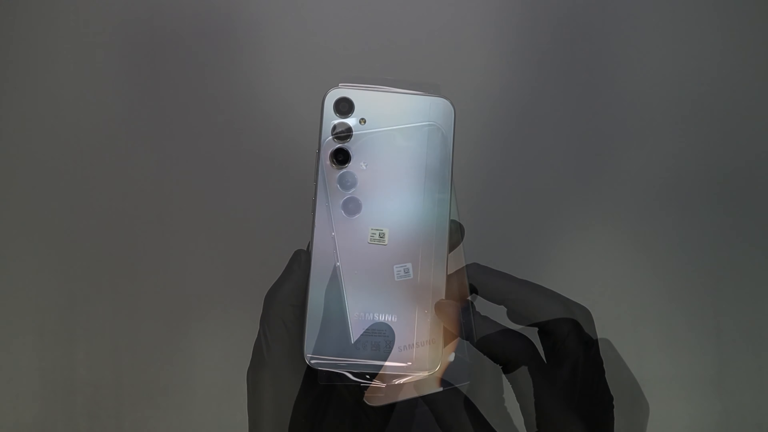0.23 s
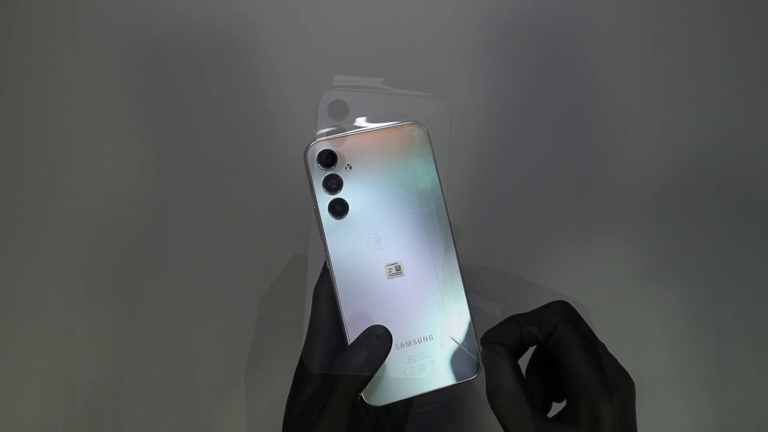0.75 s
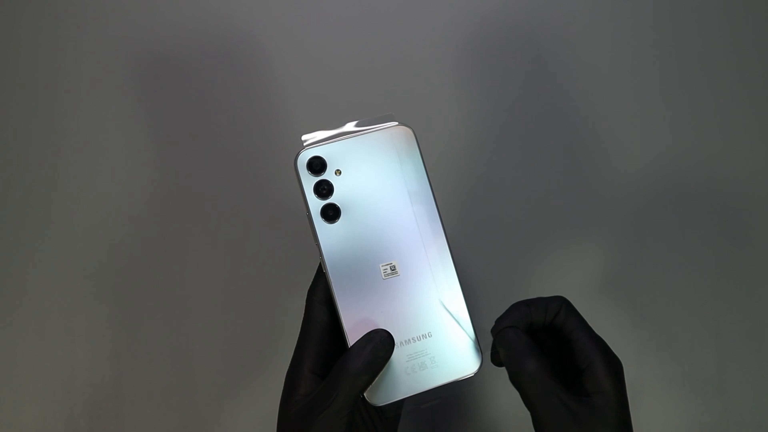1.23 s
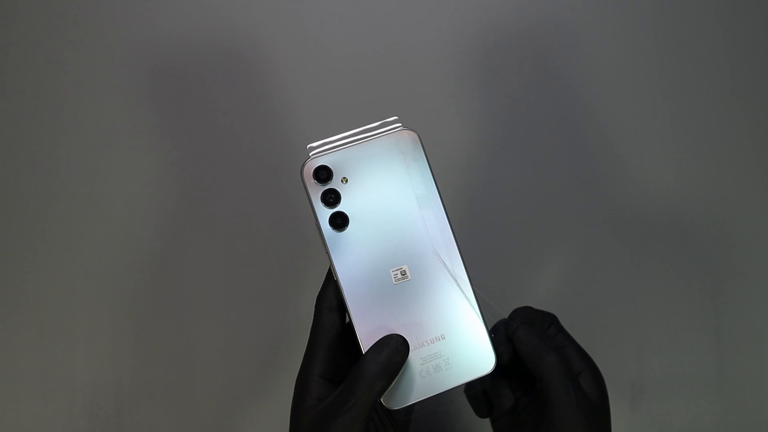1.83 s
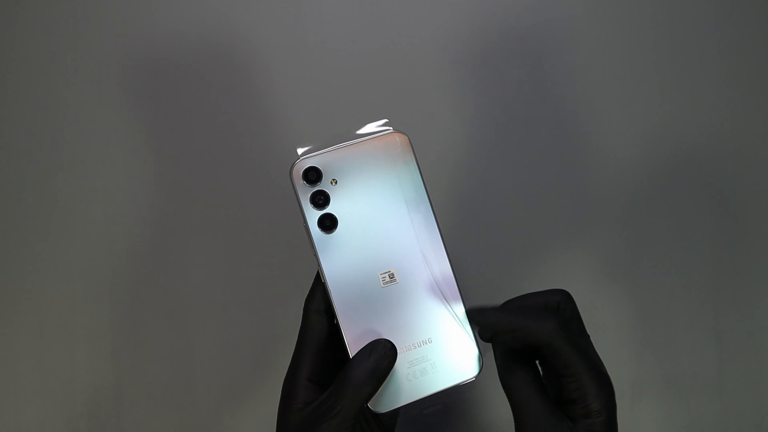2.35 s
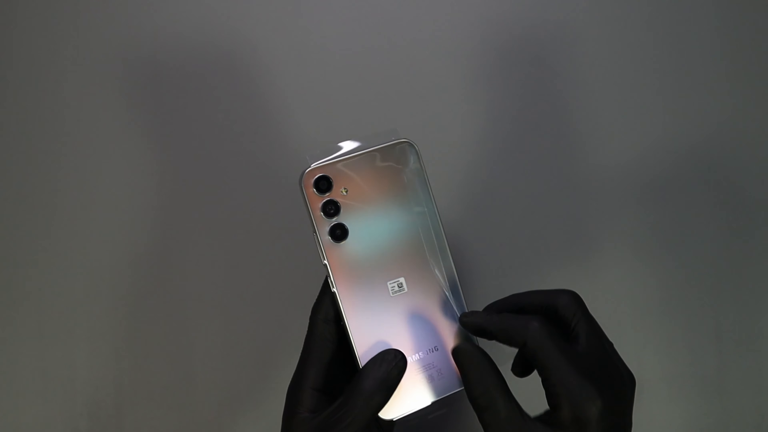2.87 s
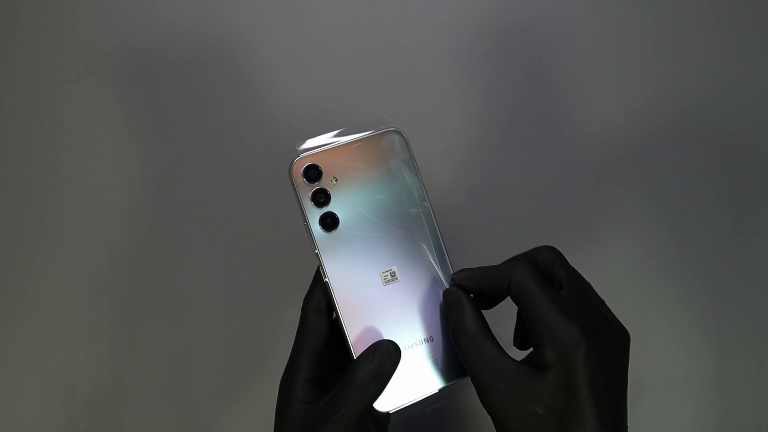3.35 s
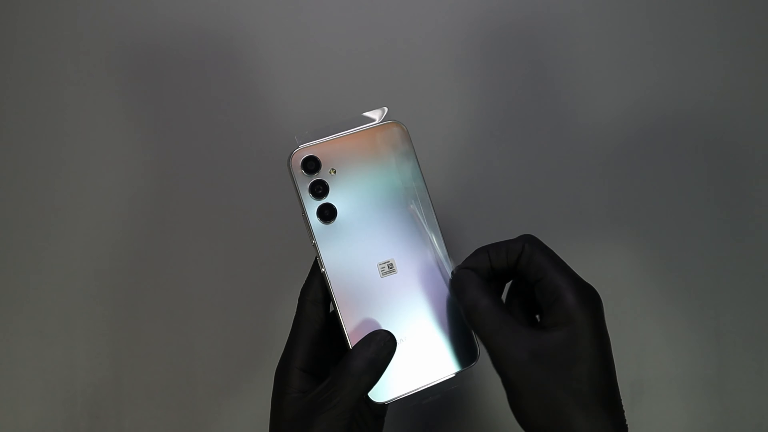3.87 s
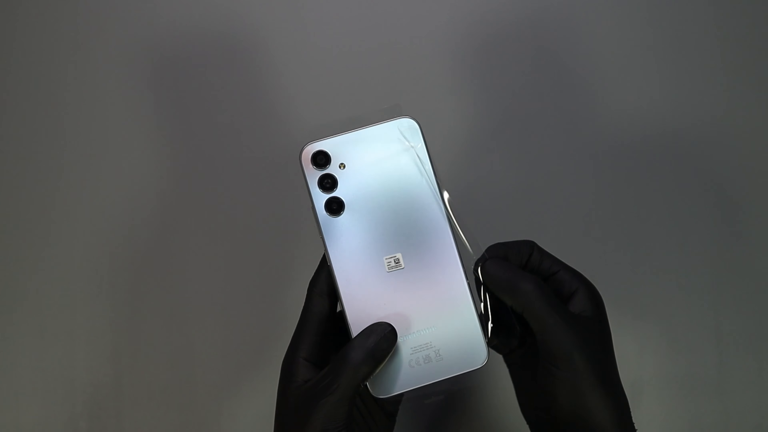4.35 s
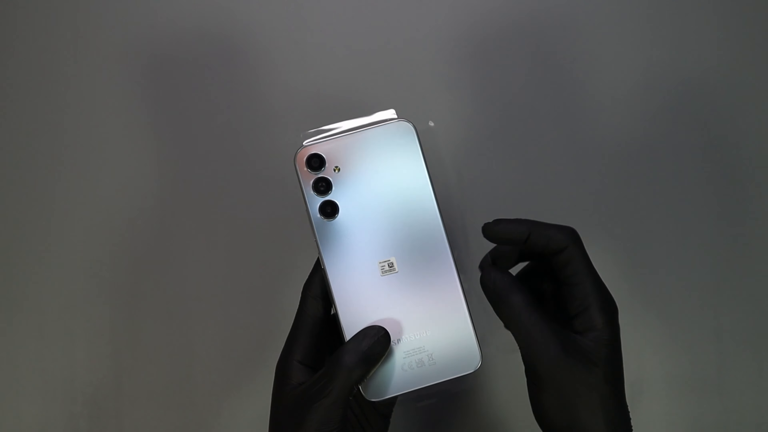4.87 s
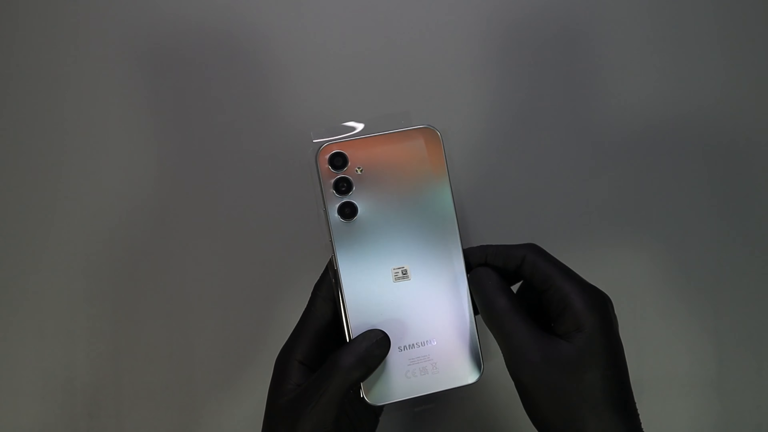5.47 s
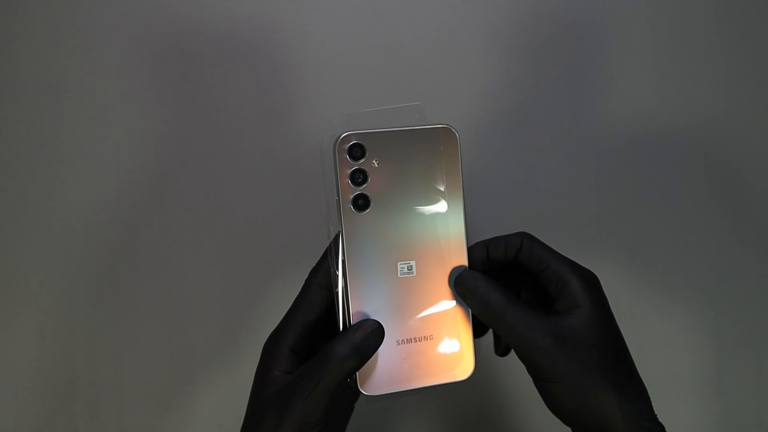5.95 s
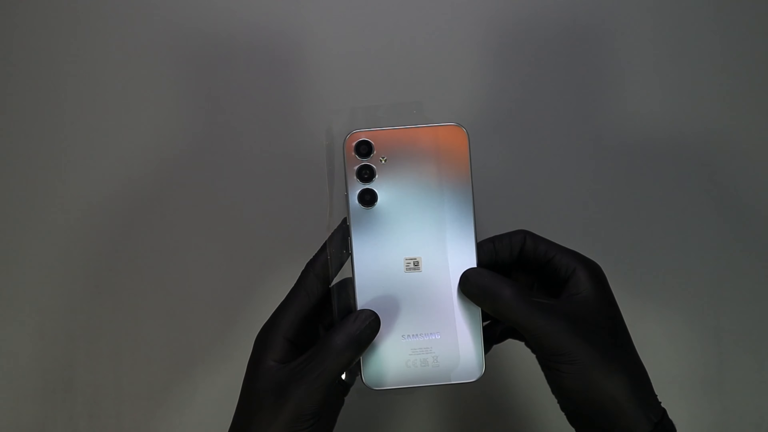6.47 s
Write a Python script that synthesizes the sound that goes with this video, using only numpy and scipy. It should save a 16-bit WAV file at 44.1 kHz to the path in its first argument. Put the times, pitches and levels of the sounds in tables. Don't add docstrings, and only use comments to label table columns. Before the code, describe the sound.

A close, detailed take in a small quiet room, with very faint ventilation rumble, low hum and hiss underneath. From 0.2 to 1.9 seconds a nail picks at thin plastic: tiny flutters, then dry bright ticks, stronger around 1.4 to 1.8, while a gloved fingertip slides with a faint airy hiss from 0.8 to 2.2. A sharp pop lands at 2.0, a duller crunch with a soft knock at 2.8, and a loud crisp pop at 3.2. A snap at 3.8 opens the steady peel; crackling hiss and hard snaps crowd 4.0 to 4.9, peaking near 4.6 with a brief hollow thud from the glass slab. Smaller clicks follow at 5.2 and 5.5, with a fluttering crinkle at 5.8. From 5.9 to the end near 6.7, muted folds crush and roll, some sliding down in pitch, amid soft rubbing and fine crackle.

```python
import sys
import numpy as np
from scipy import signal
from scipy.fft import rfft, irfft
from scipy.io import wavfile
from scipy.ndimage import uniform_filter1d

SR = 44100
rng = np.random.default_rng(int(sys.argv[2]) if len(sys.argv) > 2 else 0)


def rack_gain(trim_db):
    fader = np.asarray(trim_db, float)
    return 10 ** (fader / 20)


def dump_mix(stems):
    frames = np.atleast_2d(stems).T
    limited = np.clip(frames, -1, 1)
    pcm = np.round(limited * 32767).astype(np.int16)
    wavfile.write(sys.argv[1], SR, pcm)


N = 295911

# pitch in Hz, width in Hz, level in dB.
FILM = [(4900, 1000, -4), (5900, 3550, 1), (7500, 2200, -6)]
# pitch in Hz, width in Hz, level in dB.
EDGE = [(8400, 6900, 4.5), (12100, 3900, 2.5), (13500, 11000, -2), (15100, 2000, -8)]


def unit(x):
    return x / np.sqrt(np.mean(x ** 2))


def walk(rate):
    hold = int(SR / rate)
    levels = rng.standard_normal(N // hold + 1)
    return uniform_filter1d(np.repeat(levels, hold), hold)[:N]


def grit(size, scatter_db):
    tail = np.minimum(rng.exponential(size=size), 6.3)
    return unit(rng.standard_normal(size) * rack_gain(scatter_db * tail))


def power(hz, modes, stretch=1):
    total = 0
    for f, width, db in modes:
        off_pitch = (hz ** 2 - (f * stretch) ** 2) / (width * hz)
        total = total + rack_gain(2 * db) / (1 + off_pitch ** 2) ** 2
    return total / total.mean()


def ring(x, modes):
    hz = np.fft.rfftfreq(N, 1 / SR) + 1
    return irfft(rfft(x) * np.sqrt(power(hz, modes)), N)


def colour(points):
    hz, db = np.transpose(points)[:2]
    log_hz = np.log(np.fft.rfftfreq(N, 1 / SR) + 1)
    return irfft(rfft(rng.standard_normal(N)) * rack_gain(np.interp(log_hz, np.log(hz), db)), N)


def causal(p):
    cep = irfft(np.log(p + 1e-12) / 2)
    cep[1:len(cep) // 2] *= 2
    cep[len(cep) // 2 + 1:] = 0
    return np.exp(rfft(cep))


def slips(ms, lead):
    u = np.arange(6000) / SR / (ms / 1000)
    run = u ** 0.59 * np.exp(-u) * grit(len(u), scatter_db=3.0)
    lead = np.clip(lead, 0, 1)
    run *= np.sqrt((1 - lead) / np.sum(run ** 2))
    run[12] += np.sqrt(lead)
    return run * np.sqrt(SR * (0.00084 + ms / 1000))


def struck(rows, parts, detune, notes=()):
    size = 8192
    hz = np.fft.rfftfreq(size, 1 / SR) + 1
    out = np.zeros((3, N + size))
    stretch = 1 + detune * rng.standard_normal((len(rows), len(parts)))
    owner = [np.argmin([abs(row[0] - note[0]) for row in rows]) for note in notes]
    for k, (s, run, dbs) in enumerate(rows):
        p = sum(rack_gain(2 * db) * power(hz, modes, q) for db, modes, q in zip(dbs, parts, stretch[k]))
        for (_, f, width, db), j in zip(notes, owner):
            if j == k:
                p = p + rack_gain(2 * db) * power(hz, [(f, width, 0)])
        slip = rfft(run, size)
        lumps = uniform_filter1d(np.abs(slip) ** 2, size=40)
        even = (lumps / lumps.mean() + .1) ** -.55
        out[k % 3, int(s * SR):][:size] += irfft(slip * causal(p * even))
    return out[:, :N]


def single_rings(rows):
    out = 0
    for s, hz, width, db, ms in rows:
        hit = [(s, slips(ms, 0.16), [db])]
        out = out + struck(hit, ([(hz, width, 0)],), detune=0)[0]
    return out


def swells(gestures):
    rise_share, end_drop_db = 0.42, 11.5
    s, length, db, other_db = np.transpose(gestures)[:, :, None]
    late = np.arange(N) / SR - s
    side = length * np.where(late < 0, rise_share, 1 - rise_share)
    shape = rack_gain(-end_drop_db * np.abs(late / side) ** 1.32)
    return [np.sqrt(np.sum((rack_gain(top_db) * shape) ** 2, axis=0)) for top_db in (db, db + other_db)]


def air():
    # pitch in Hz, level in dB per Hz.
    air_curve = [(15, -43), (45, -7.5), (150, -7), (260, -13), (480, -14.5), (1200, -23.5), (3500, -26),
                 (16000, -29)]
    # pitch in Hz, width in Hz, level in dB.
    hum_bands = [(195.6, 39, -80.5), (368.3, 9.2, -81)]
    tone_hz, tone_db, air_db = 201.4, -70, -66
    skirt = sum(rack_gain(db) * ring(rng.standard_normal(N), [(hz, width, 0)]) for hz, width, db in hum_bands)
    tone = rack_gain(tone_db + 0.7 * walk(3.1)) * np.sin(2 * np.pi * tone_hz * np.arange(N) / SR)
    return rack_gain(air_db + .4 * walk(3)) * unit(colour(air_curve)) + skirt + tone


def room(x):
    # delay in ms, level in dB.
    near_echoes = [
        (1.3, -14),
        (3.4, -15.5),
        (12.3, -20.5),
        (28, -22),
    ]
    # middle of the band in Hz, time to fall by 60 dB in seconds, level in dB.
    tail_bands = [(200, 0.32, -12.5), (436.5, 0.38, -15.5), (960, 0.23, -14), (1656, 0.28, -12),
                  (3465, 0.33, -15), (6900, 0.38, -16.5), (12500, 0.31, -15.5)]
    t = np.arange(SR // 2) / SR
    tail = signal.unit_impulse(len(t))
    for ms, db in near_echoes:
        blur = rng.standard_normal(128) * np.exp(-t[:128] / .0006)
        tail[int(ms * SR / 1000):][:128] += rack_gain(db) * blur / np.sqrt(np.sum(blur ** 2))
    for hz, t60, db in tail_bands:
        band = signal.butter(2, [hz / 1.43, min(hz * 1.43, .45 * SR)], "band", fs=SR, output="sos")
        fade = (1 - np.exp(-t / 0.00085)) * rack_gain(-60 * t / t60)
        noise = signal.sosfilt(band, rng.standard_normal(len(t)))
        tail += rack_gain(db - 22.5) * noise * fade
    return signal.fftconvolve(x, tail)[:N]


def stroke():
    # time in seconds, level in dB.
    slide = [
        (0.75, -78),
        (0.886, -64.5),
        (1.044, -62.5),
        (1.436, -63),
        (1.594, -66),
        (1.774, -67),
        (2.046, -70),
        (2.2, -81),
    ]
    # pitch in Hz, width in Hz, level in dB.
    gap = [(6200, 900, -12), (7050, 1400, 0), (7900, 800, -6)]
    s, db = np.transpose(slide)
    level_db = np.interp(np.arange(N) / SR, s, db, -120, -120) - 3.5
    gain = rack_gain(level_db + 2.1 * walk(30))
    return ring(gain * grit(N, scatter_db=5.0), gap)


def rub():
    # time of most effort in seconds, length in seconds,
    # film level in dB, free edge in dB against the film.
    pulls = [(0.274, .3, -78, 3), (1.007, 0.31, -61, 0.5), (1.568, 0.64, -64.5, 12.5),
             (2.254, 0.44, -64, -9), (2.797, 0.55, -63.5, -7), (3.398, 0.37, -65, 0.5),
             (3.764, 0.15, -53, 0), (4.003, 0.54, -48.5, -3), (4.5, 0.57, -50, -5), (4.597, .1, -35, 0),
             (4.724, 0.063, -48, -20), (4.936, 0.089, -49, -26), (5.297, 0.35, -59.5, -5),
             (5.547, 0.39, -63, -6), (5.87, 0.24, -60, -4), (6.1, 0.34, -70, 3), (6.7, 0.82, -54.5, 0.5)]
    # time of most pressure in seconds, length in seconds,
    # palm level in dB, fingertip in dB against the palm.
    grips = [(0.328, .3, -89, 15), (1.047, 0.27, -74, 3), (1.586, 0.52, -67, 5), (2.3, 0.51, -72.5, 7.5),
             (2.83, 0.32, -61.5, 3.5), (3.338, 0.15, -63, -10), (3.858, 0.22, -56.5, -7),
             (4.048, 0.46, -63, -1), (4.45, 0.43, -52.5, 0.5), (4.591, 0.081, -39.5, -8),
             (4.72, 0.097, -55, -14), (4.944, 0.16, -57, -17), (5.296, 0.12, -67.5, 13),
             (5.453, 0.31, -67.5, -2.5), (5.774, 0.31, -60, -4), (5.99, 0.28, -75.5, 15),
             (6.4, 0.39, -53, -1.5), (6.7, 0.53, -56, 4.5)]
    # pitch in Hz, width in Hz, level in dB.
    palm = [(1200, 760, -2), (1900, 830, 0)]
    fingertip = [(3000, 1300, 0), (4270, 2300, -1)]
    shared_db = 0.9 * walk(25)
    out = 0
    for gain, modes in zip(swells(pulls) + swells(grips), (FILM, EDGE, palm, fingertip)):
        gain = gain * rack_gain(-8.0 + shared_db + .7 * walk(51))
        out = out + ring(gain * grit(N, scatter_db=5.0), modes)
    return out


def knocks():
    # time in seconds, peak of the slab's lowest bend in dB,
    # jolt under 200 Hz in dB, length in ms.
    blows = [(2.7928, -26, -77, 1.64), (3.205, -54, -80, 4.5), (3.725, -48.5, -69, 1.8),
             (3.786, -46, -65, 2.5), (4.167, -49, -61, 7.6), (4.321, -50.5, -73, 3.6),
             (4.432, -40, -62, 2.1), (4.5705, -21.5, -32, 4), (4.585, -21, -58, 1.8),
             (4.691, -42, -57, 3.2), (4.778, -43, -65, 3), (4.879, -33, -58, 5.1), (4.952, -46.5, -58, 7.5),
             (5.238, -35, -47, 4.1), (5.534, -46, -62, 1.8), (5.76, -62, -76, 2.2), (5.9, -53, -75, 13),
             (6.136, -49, -73, 4.1), (6.502, -47, -59, 5.9)]
    # pitch in Hz, width in Hz, level in dB.
    bend = [(298, 71, -5), (356, 46, 1), (460, 370, -4), (216, 100, -12)]
    jolt = [(42, 33, -1.5), (69, 41, 0.5), (128, 48, -1.5)]
    rows = [(s + .0012, slips(ms, 0.52), [bend_db - 3.0, jolt_db]) for s, bend_db, jolt_db, ms in blows]
    return struck(rows, (bend, jolt), detune=0.014)


def hollows():
    # start in seconds, pitch in Hz, width in Hz, level in dB, length in ms.
    thuds = [(1.575, 1830, 500, -52, 5.7), (2.033, 1700, 300, -62, 11), (3.79, 2390, 700, -46, 5.7),
             (4.417, 590, 500, -37.5, 1.1), (4.5735, 720, 300, -18, 0.78), (4.575, 600, 260, -25, 1.2),
             (4.584, 1680, 800, -24, 2.6), (4.88, 412, 260, -35.5, 2), (3.213, 1750, 500, -44.5, 10),
             (3.793, 1400, 890, -44, 13), (4.458, 710, 250, -47.5, 3), (4.586, 430, 260, -26, 2.5),
             (4.783, 600, 346, -47, 3.1), (4.838, 740, 300, -44, 2.5), (5.24, 750, 220, -40.5, 3.8),
             (5.54, 520, 350, -50, 3), (6.005, 500, 399, -59, 12), (6.4, 431, 250, -58, 12),
             (5.241, 480, 200, -41.5, 5), (5.536, 300, 170, -43, 1.4), (5.763, 1800, 300, -43, 13),
             (5.73, 1200, 1200, -59, 4.8)]
    return single_rings(thuds)


def flaps():
    # start in seconds, pitch in Hz, width in Hz, level in dB, length in ms.
    flutters = [(.222, 9600, 1600, -70, 14), (.303, 9600, 1500, -67, 20), (.403, 9300, 1500, -64, 6.3),
                (1.42, 12500, 5000, -63, 40), (2.69, 8300, 1500, -66, 7.4), (3.43, 7200, 2500, -66, 18),
                (.31, 3750, 600, -70.5, 34), (.40, 7500, 1500, -62, 9), (2.316, 4130, 500, -60.5, 13),
                (3.963, 4900, 600, -46, 8.7), (5.455, 5030, 1300, -66.5, 72),
                (5.762, 4440, 708, -37.5, 12.4), (4.5725, 6900, 1820, -13, 0.88),
                (2.8, 4180, 350, -50.5, 15), (3.79, 9550, 4000, -46, 16), (4.37, 7000, 3500, -44, 23),
                (4.44, 7500, 3500, -42, 22), (5.77, 5400, 1300, -45, 22), (5.775, 8000, 4000, -53.5, 24)]
    return single_rings(flutters)


def afters():
    # start in seconds, pitch in Hz, width in Hz, level in dB, length in ms.
    late_slips = [(2.034, 3150, 300, -58, 22), (2.033, 1050, 200, -57, 10), (2.036, 1720, 240, -61, 14),
                  (2.8, 2420, 250, -56, 18), (2.797, 450, 120, -47, 4), (3.214, 5250, 700, -49, 28),
                  (3.216, 1750, 250, -59, 28), (3.795, 1250, 350, -53, 15), (2.8, 5750, 500, -56, 18),
                  (4.05, 440, 250, -56, 3), (4.07, 350, 200, -60, 4), (4.022, 420, 250, -57, 3),
                  (5.243, 6600, 1800, -46, 14), (5.2412, 2400, 2200, -30, 1), (5.242, 4800, 900, -37, 1.2),
                  (5.2485, 700, 400, -38, 1), (5.5195, 600, 900, -46, .6), (5.525, 380, 200, -54, 1.5),
                  (5.877, 2600, 2500, -43, 1.5), (6.14, 400, 200, -58, 4), (6.541, 650, 500, -52, 3),
                  (6.558, 700, 400, -54, 5), (6.142, 3950, 500, -47, 14), (6.62, 380, 200, -64, 25),
                  (6.698, 700, 300, -53, 3), (6.378, 600, 500, -57, 4), (4.879, 520, 200, -44, 12),
                  (5.5365, 350, 200, -43, 1.2), (5.537, 760, 200, -49, 2.5), (5.4665, 5500, 2500, -52, .6),
                  (5.574, 4800, 2500, -53, .6), (6.449, 2500, 2500, -50, .5), (6.461, 3000, 900, -54, 5),
                  (3.21, 8500, 2500, -51, 16), (4.5755, 720, 300, -20.5, 1)]
    return single_rings(late_slips)


def rolls():
    # start in seconds, first pitch in Hz, last pitch in Hz, level in dB, length in ms.
    rolling_folds = [
        (6.2905, 3400, 1700, -37.5, 7.5),
        (6.325, 3300, 1700, -45, 13),
        (6.4995, 4300, 1600, -40, 10.5),
        (6.5685, 4500, 2800, -48, 3.5),
        (6.59, 5000, 3000, -51, 4),
        (5.537, 2100, 1500, -57, 8),
        (5.868, 1500, 2200, -49, 12),
        (6.528, 4000, 2200, -56, 9),
    ]
    width_share, swell = .5, .15
    out = np.zeros(N + 2048)
    for s, start_hz, end_hz, db, ms in rolling_folds:
        u = np.arange(2048) / SR / (ms / 1000)
        hz = start_hz * (end_hz / start_hz) ** np.minimum(u, 1)
        drive = grit(len(u), scatter_db=3.0) + 1j * grit(len(u), scatter_db=3.0)
        drive = drive * np.clip(4 * (1.1 - u), 0, 1) * u ** swell
        keep = np.exp(-np.pi * width_share * np.sqrt(start_hz * end_hz) / SR)
        sway = signal.lfilter([1], np.poly([keep, keep]), drive)
        run = np.real(sway * np.exp(2j * np.pi * np.cumsum(hz) / SR))
        out[int(s * SR):][:len(u)] += rack_gain(db) * run * np.sqrt(ms / 1000 * SR / np.sum(run ** 2))
    return out[:N]


def snaps():
    # time in seconds, peak of film in dB, crease in dB, glass in dB;
    # tears and crushes add a length in ms.
    picks = [(.4549, -32, -80, -59.5), (.6237, -44, -60, -62), (.8702, -44, -70, -74),
             (1.1039, -42, -69, -70), (1.1294, -44, -84, -82), (1.229, -39, -57, -56.5),
             (1.2904, -46, -76, -70), (1.3577, -32.5, -51.5, -53), (1.4133, -37, -58, -69),
             (1.4334, -28, -49, -49.5), (1.5708, -21.5, -35.5, -44.5), (1.715, -29.5, -52, -57),
             (1.733, -25.5, -52, -38), (1.7844, -29, -54, -56), (1.8606, -42.5, -57, -64),
             (2.1826, -37, -52, -44.5), (2.485, -50, -64, -53)]
    peels = [(3.6435, -36, -62, -76), (3.6606, -52, -60, -70), (3.6919, -35, -48, -57),
             (3.7186, -34.5, -50, -53.5), (3.764, -32.5, -68, -62), (3.7879, -15, -34.5, -28),
             (3.875, -35, -57, -56), (4.0495, -47, -49, -38), (4.124, -36, -47, -55),
             (4.148, -43, -48, -48), (4.1863, -39, -42, -46), (4.7037, -28, -30, -35),
             (6.5573, -53, -63, -44.5), (6.569, -44, -52, -56), (6.59, -42, -54, -60),
             (6.62, -41, -38.5, -43), (6.6402, -48, -62, -51), (6.698, -36, -48, -48.5)]
    pops = [(.5646, -52, -63, -58.5), (.7447, -46, -65, -82), (.94, -43, -72, -77),
            (2.0279, -15.5, -35, -33.5), (2.368, -37, -72, -43.5), (3.034, -39, -57, -65),
            (3.2088, -7.5, -27.5, -27), (3.8577, -29, -48, -44), (4.069, -24.5, -42.5, -37.5),
            (4.1565, -17.5, -33, -41), (4.1682, -10.5, -46, -33), (4.2343, -13, -30, -50),
            (4.6937, -14.5, -32.5, -31.5), (4.8372, -44.5, -53, -44), (4.8439, -38, -41.5, -40.5),
            (5.2335, -25, -48, -54), (5.31, -47, -47, -49), (5.519, -49, -58, -55), (5.7605, -31, -45, -48),
            (5.9722, -49.5, -48, -45.5), (6.2894, -53, -29, -40), (6.4047, -38, -45, -55)]
    tears = [(.2244, -58, -95, -93, 16), (.3044, -57, -78, -85.5, 19), (.3394, -52.5, -76, -90, 16),
             (.404, -50, -83, -73, 4.5), (2.2594, -34, -56.5, -61.5, 3.1), (3.192, -45, -61, -62, 22),
             (3.9627, -29.5, -49.5, -61, 3.8), (4.3193, -46.5, -57, -57.5, 3.3),
             (4.572, -8, -20, -21.5, 3.94), (4.7804, -61, -69, -62, 7.5), (5.205, -50.5, -67.5, -75, 21),
             (6.119, -46, -56.5, -56, 5.5)]
    crushes = [(2.3281, -46, -57, -59.5, 4.5), (2.7955, -20, -31.5, -31.5, 0.94),
               (4.0215, -16, -33, -43, 2.05), (4.363, -6.5, -27.5, -33.5, 1.15),
               (4.433, -9.5, -28, -41, 1.55), (4.880, -19, -31, -33.5, 1.6),
               (4.9495, -34.5, -47, -47.5, 2.24), (5.225, -34, -60, -59.5, 2), (5.2365, -30, -41, -37, 2),
               (5.5385, -41.5, -65, -52, 2.2), (5.7615, -28, -40.5, -44.5, 19), (5.874, -56, -53, -54, 4.5),
               (5.9005, -53.5, -40, -46.5, 2.3), (5.907, -46.5, -36, -45.5, 2.54),
               (6.0052, -51.5, -51.5, -58, 1.46), (6.0007, -51, -59.5, -63, 9.5),
               (6.136, -35, -30, -39, 4.86), (6.3253, -60, -58, -52, 4.5), (6.5002, -70, -45, -46, 4.7)]
    # time of the snap in seconds, pitch in Hz,
    # width in Hz, level in dB.
    grip_notes = [(1.571, 1610, 300, -39.5), (2.028, 1650, 350, -32), (3.209, 8600, 2000, -40),
                  (4.572, 594, 260, -26), (4.704, 3200, 500, -30), (4.879, 3180, 600, -29.5),
                  (4.156, 3930, 1200, -30), (.455, 7900, 1530, -41), (1.433, 7900, 1800, -37.5),
                  (1.571, 1950, 695, -33), (1.733, 710, 200, -51), (1.733, 1140, 400, -39),
                  (2.028, 1110, 300, -41), (2.028, 764, 250, -55), (2.028, 3220, 700, -33.5),
                  (2.795, 820, 380, -29.5), (2.795, 640, 200, -36), (2.795, 2370, 450, -35),
                  (2.795, 5840, 1400, -36.5), (3.209, 2270, 500, -49), (3.209, 5100, 2000, -23.5),
                  (3.788, 860, 300, -32), (3.788, 1690, 500, -25), (4.021, 7300, 1800, -34.5),
                  (4.156, 1450, 399, -41), (4.234, 1680, 606, -42), (4.363, 1480, 401, -42.5),
                  (4.363, 7200, 1800, -18.5), (4.433, 600, 300, -31), (4.433, 1833, 500, -32),
                  (4.433, 7400, 2000, -27), (4.572, 9000, 2180, -26), (4.572, 13800, 3000, -25),
                  (4.694, 590, 280, -34), (4.879, 557, 200, -38.5), (4.879, 5610, 1400, -39),
                  (5.236, 1600, 600, -38), (5.236, 4900, 2000, -39), (6.136, 699, 200, -41.5),
                  (6.136, 2200, 504, -38.5), (6.136, 5050, 1800, -38.5), (6.289, 2300, 600, -36),
                  (6.5, 2480, 900, -44), (6.5, 1200, 500, -46), (6.62, 2300, 1200, -32)]
    # pitch in Hz, width in Hz, level in dB.
    slab = [(640, 240, -7.5), (766, 100, -1), (1070, 300, -5)]
    panel = [(1380, 750, -5.5), (1688, 510, 4), (2260, 570, -5.5)]
    crease = [(3000, 1600, -1.5), (3325, 1100, 0.94), (4300, 910, -0.98)]
    # its snaps, free edge in dB against the film, slab in dB against its panel
    kinds = [(picks, 2.1, -5.5), (peels, 4.1, -2), (pops, -9.5, -8), (tears, -0.5, -1.5), (crushes, -8, -5.5)]
    short_ms = 0.87
    rows = []
    for table, edge_db, slab_db in kinds:
        for s, film_db, crease_db, glass_db, *length in table:
            ms = length[0] if length else short_ms
            film_db = film_db - 15.5
            dbs = [film_db, glass_db + slab_db, glass_db, crease_db, film_db + edge_db]
            start = s + 0.00054 - min(ms, 5) * 0.00044
            rows.append((start, slips(ms, 0.52 * (short_ms / ms) ** 3), dbs))
    rows.sort(key=lambda row: row[0])
    return struck(rows, (FILM, slab, panel, crease, EDGE), detune=0.029, notes=grip_notes)


def scene():
    places = snaps() + knocks()
    places[0] += rub() + stroke()
    places[1] += flaps() + hollows()
    escapes = rack_gain(-2 * np.clip((np.arange(N) / SR - 5.85) * 20, 0, 1))
    near = sum(room(x * escapes) + x * (1 - escapes) for x in places)
    return (near + air() + room(afters() + rolls()))[None]


def low_pass(x):
    return signal.sosfilt(signal.butter(12, 16830, fs=SR, output="sos"), x)


def record(dry):
    cut = signal.sosfilt(signal.ellip(8, .3, 34, 15900, fs=SR, output="sos"), dry)
    cut = signal.sosfilt(signal.ellip(8, .3, 50, 16770, fs=SR, output="sos"), cut)
    cut = signal.sosfilt(signal.butter(2, 42, "high", fs=SR, output="sos"), cut)
    return low_pass(cut)


dry = scene()
out = record(dry)
dump_mix(out)
```